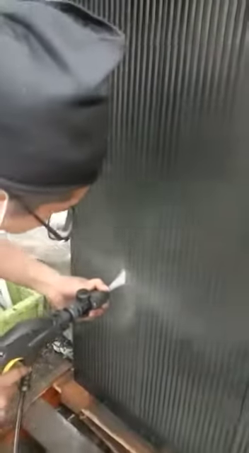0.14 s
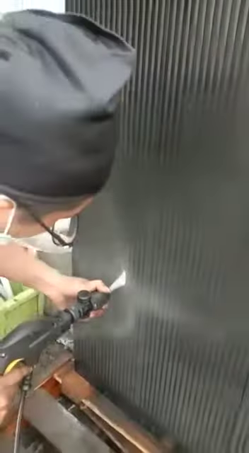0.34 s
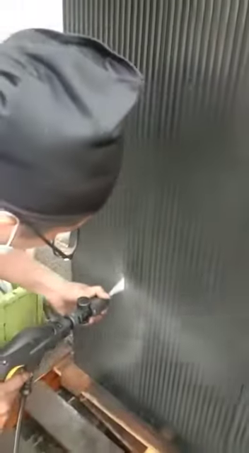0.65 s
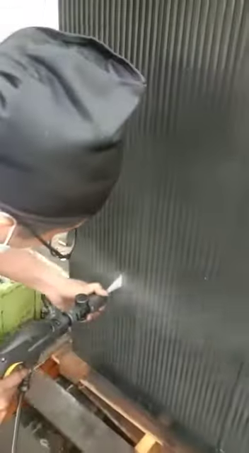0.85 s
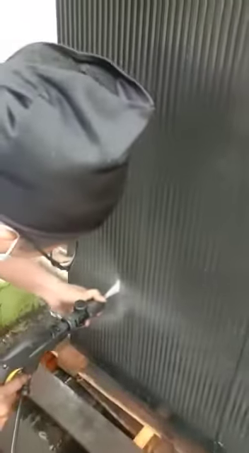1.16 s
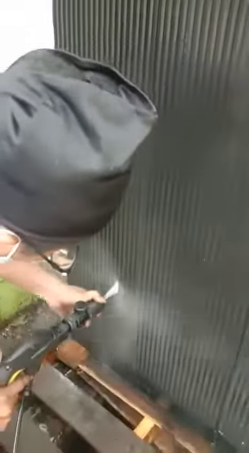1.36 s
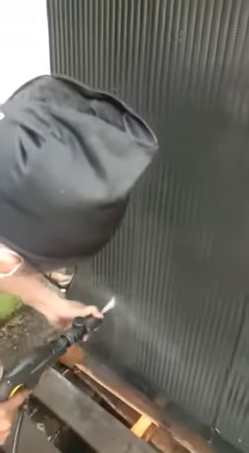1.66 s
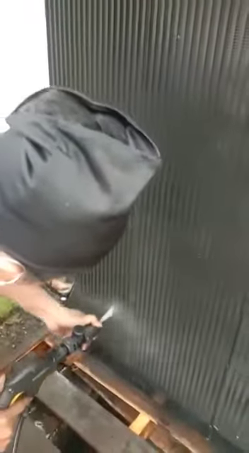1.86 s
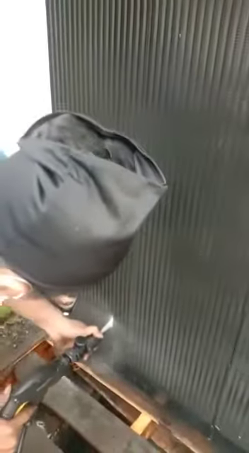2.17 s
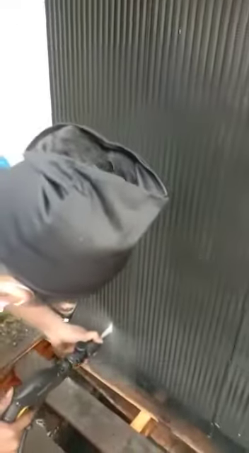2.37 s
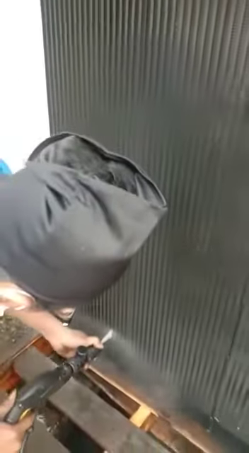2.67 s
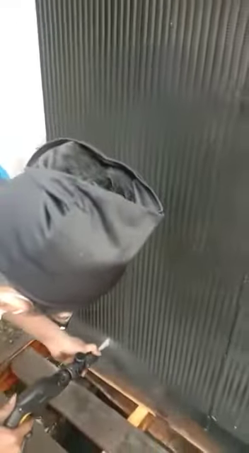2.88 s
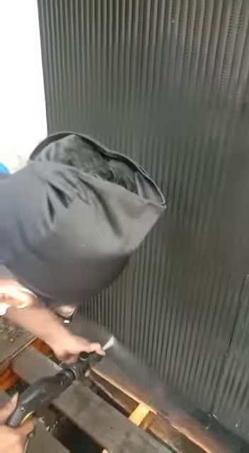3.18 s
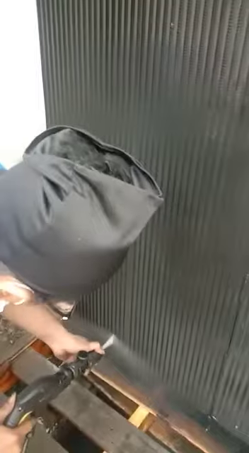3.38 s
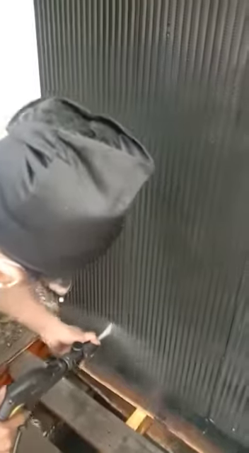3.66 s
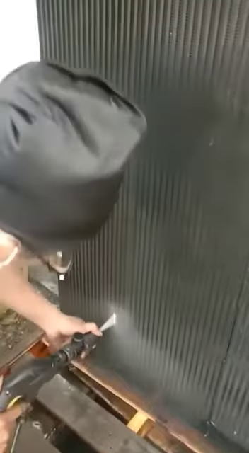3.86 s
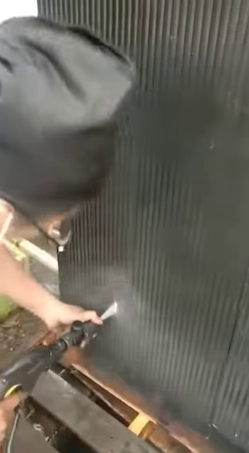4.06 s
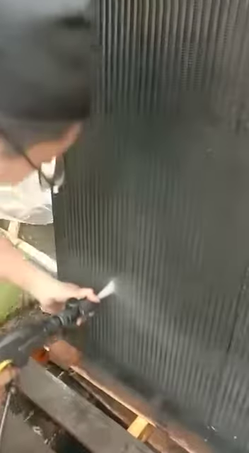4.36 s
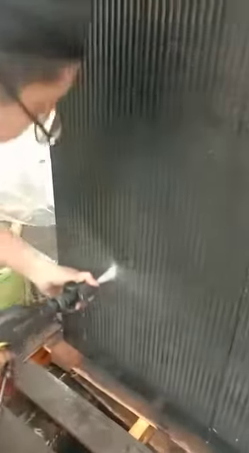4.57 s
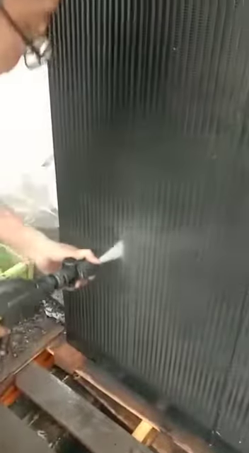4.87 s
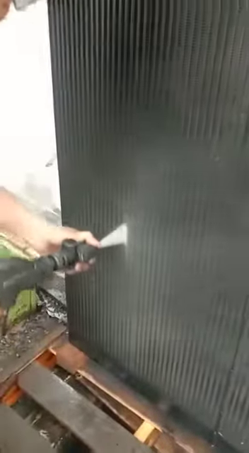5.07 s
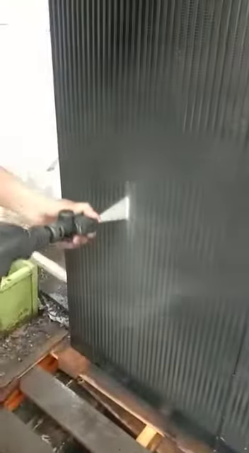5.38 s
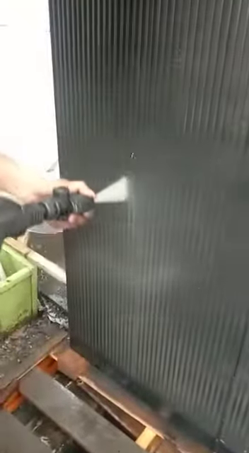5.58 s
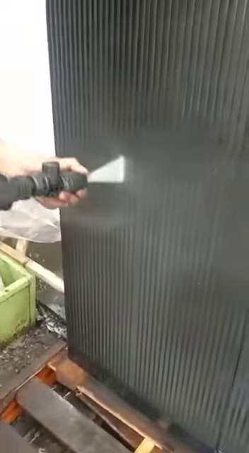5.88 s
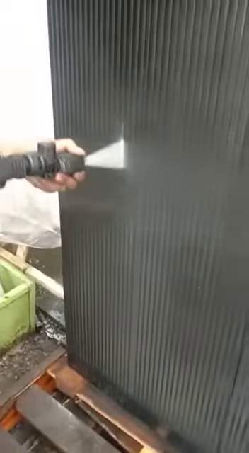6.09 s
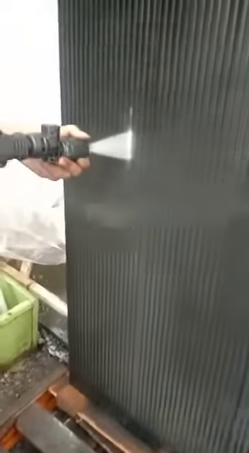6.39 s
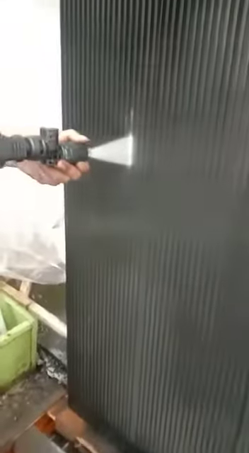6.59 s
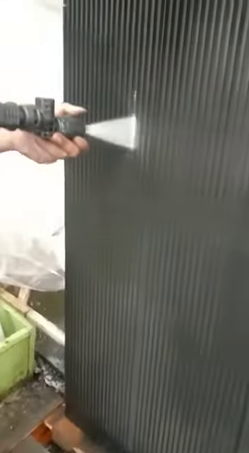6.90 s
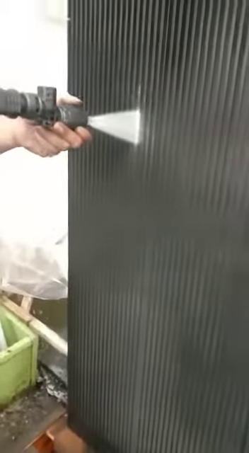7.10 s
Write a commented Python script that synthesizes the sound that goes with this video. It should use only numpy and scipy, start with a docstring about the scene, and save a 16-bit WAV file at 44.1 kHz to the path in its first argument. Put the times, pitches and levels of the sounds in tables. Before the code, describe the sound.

Close by in a workshop, a fan of high-pressure water hisses without a break against the metal fins of a cooler core. Splatter and faint, breathy whistles change colour as the jet moves down, then climbs again. One soft bump comes near the middle and two more a little later. Toward the end the water drums and rings more on the metal. A steady pump hum and low rumble lie beneath.

```python
"""Pressure washing a cooler core

A fan jet sweeps down and up a finned metal core in a workshop. It tears into hissing mist, drums and
splatters on the metal and whistles hoarsely across the fins; a near reflection colours it as the nozzle
moves. The pump and a second motor hum over a low rumble, with three soft bumps."""
import sys
import numpy as np
from scipy import signal
from scipy.fft import rfft, irfft
from scipy.io import wavfile
from scipy.ndimage import uniform_filter1d

SR = 44100
rng = np.random.default_rng(int(sys.argv[2]) if len(sys.argv) > 2 else 0)


def int16_out(signal):
    """Quantize to a 16-bit WAV file."""
    q = np.round(np.clip(np.atleast_2d(signal).T, -1, 1) * 32767)
    wavfile.write(sys.argv[1], SR, q.astype(np.int16))


N = 319284
TIME_S = np.arange(N) / SR
FRAME_S = np.arange(N // 512 + 6) * 512 / SR
BIN_HZ = np.fft.rfftfreq(2048, 1 / SR)
PUMP_SHAFT_HZ, MOTOR_SHAFT_HZ = 45.47, 48.9


def jet(height, slant, echo):
    """The jet tears into spray; each stroke of the three pistons lifts the pressure a little."""
    # a treble hollow slides up as the jet turns square, deepest halfway
    hollow_db = 6.5 * np.sin(np.pi * slant) ** 2 * peak(15000 - 4600 * slant, width_hz=1450)
    patchy_db = 1.5 * patches(frames=13, bins=7)
    spray = (hiss(slant) + mist(height) + sizzle()) * echo * gain_of(patchy_db - hollow_db) ** 2
    flutter_db = 1.2 * patches(frames=4, bins=70) * peak(15800, width_hz=1400)
    strokes = 1 + 0.035 * np.sin(2 * np.pi * 3 * PUMP_SHAFT_HZ * TIME_S)
    return noise(spray * gain_of(flutter_db) ** 2) * strokes * gain_of(0.12 * wander(rate_hz=40))


# Hiss spectrum: freq_hz, relative_db
HISS_SPECTRUM = [(300, -24.5), (900, -14), (2000, -4), (2700, -7), (3100, -0.5), (3800, -1), (5000, -0.5),
                 (5700, 0), (6280, -6), (6680, .5), (7100, 0), (7500, -3), (8050, -15), (16000, -31)]
# Fin channels at full slant: centre_hz, width_hz, gain_db
FIN_CHANNELS = [(2550, 150, -5), (3110, 150, -4.5), (3440, 240, 1), (4350, 330, 2), (4860, 360, -4.5),
                (5900, 590, 3), (6100, 330, 2), (6580, 240, 3.5), (8000, 400, -1.5)]
def hiss(slant):
    """Hiss power; a slanting jet sounds the channels between the fins."""
    channels_db = slant * sum(db * peak(hz, width_hz) for hz, width_hz, db in FIN_CHANNELS)
    return power(colour(HISS_SPECTRUM) * gain_of(channels_db), db=-24)


# Mist spectrum: freq_hz, relative_db
MIST_SPECTRUM = [(5000, -17.5), (7400, -24), (8050, -14), (8650, -2.5), (9500, -0.5), (10200, 1),
                 (11000, 3.5), (12500, 1), (14000, 1.5), (16000, -6)]
def mist(height):
    """Power of the mist thrown off the fins, strongest low on the core."""
    return power(colour(MIST_SPECTRUM), db=-24.5 - 6.5 * height)


# Sizzle spectrum: freq_hz, relative_db
SIZZLE_SPECTRUM = [(8000, -34), (11500, -31), (13200, -7), (13900, -10), (14300, -1), (14620, 4),
                   (15000, 3), (15450, -1), (16000, -23)]
# Sizzle envelope: time_s, relative_db
SIZZLE_ENVELOPE = [(0.0, -26), (0.55, -23), (0.95, -29), (1.3, -24.6), (1.6, -28), (2.25, -25),
                   (2.7, -28.5), (3.9, -25.7), (4.3, -26.7), (5.2, -22), (5.55, -24), (5.95, -30),
                   (6.4, -27.5), (7.24, -29.5)]
def sizzle():
    """Power of the shrill top of the spray."""
    envelope_db, = follow(SIZZLE_ENVELOPE)
    return power(colour(SIZZLE_SPECTRUM), db=envelope_db + 1.4)


def core(height, slant, echo):
    """Water beats on the core: drumming, ringing, splatter and whistles."""
    patchy_db = 1.9 * patches(frames=7, bins=6)
    fins = (splatter(height) + whistles(height)) * echo * gain_of(patchy_db) ** 2
    return noise(drumming(slant) + ring(height) + fins) * gain_of(0.35 * wander(rate_hz=14))


# Core modes: centre_hz, width_hz, square_relative_db, slanted_relative_db
DRUM_MODES = [(647, 78, -5, -1.5), (672, 45, 1, -18), (770, 47, -15, -2.5), (817, 48, 0, -6),
              (878, 60, 1.5, -2), (980, 180, -10, -5)]
def drumming(slant):
    """Power of the core's hollow modes; it drops fastest as the jet first tilts."""
    blended = [(hz, width_hz, square_db + slant * (slanted_db - square_db))
               for hz, width_hz, square_db, slanted_db in DRUM_MODES]
    return power(modes(blended), db=-27 - 14 * slant ** 0.67)


# Ring and its lower neighbours: pitch_ratio, width_hz, relative_db
RING_MODES = [(.868, 45, -10.5), (.925, 75, -9.5), (1, 52, 0)]
# Lively spots on the core: centre_s, half_length_s, lift_db
RING_FLARES = [(1.13, 0.15, 2.5), (2.22, 0.18, 6), (2.58, 0.15, 4.5), (4.1, 0.27, 3.5), (4.5, 0.13, 5.5)]
def ring(height):
    """Power of a narrow ring that grows with height; the pallet damps it at the foot."""
    pitch_hz = 1247 + 36 * height
    shape = modes([(ratio * pitch_hz, width_hz, db) for ratio, width_hz, db in RING_MODES])
    damping_db = 10 * np.exp(-height / 0.041)
    return power(shape, db=-36.5 + 11 * height - damping_db + swells(RING_FLARES))


# Splatter spectrum: freq_hz, relative_db
SPLATTER_SPECTRUM = [(300, -27.5), (700, -10.5), (1030, -21), (1120, -6.5), (1400, -3.5), (1560, -0.5),
                     (1750, -2.5), (2050, 0.5), (2300, 1.5), (2700, -1), (3050, -10), (4500, -29),
                     (8000, -43)]
def splatter(height):
    """Power of water splattering on the fins, strongest high on the core."""
    return power(colour(SPLATTER_SPECTRUM), db=-30 + 5 * height)


# Whistles: start_s, end_s, midway_pitch_hz, level_db
FIN_WHISTLES = [(0.093, .7, 2020, -30.5), (.2, .65, 2650, -31.5), (0.965, 1.6, 2670, -26),
                (1.5, 2.054, 2760, -31.5), (1.72, 2.1, 3460, -32), (2.785, 3.153, 3710, -27.5),
                (2.9, 3.35, 1470, -37.5), (3.15, 3.6, 4270, -30.5), (3.695, 4.332, 2180, -31),
                (3.7, 4.31, 2390, -30), (3.75, 4.263, 2850, -29), (3.78, 4.4, 4020, -30),
                (4.4, 5.0, 1730, -34), (4.68, 5.247, 2370, -27.5), (5.65, 6.25, 1820, -29)]
def whistles(height):
    """Power of hoarse whistles where the jet grazes the fins; pitch sinks as the nozzle climbs."""
    sag_octaves = 0.41  # over the full height
    total = 0
    for start_s, end_s, pitch_hz, level_db in FIN_WHISTLES:
        progress = np.clip((FRAME_S - start_s) / (end_s - start_s), 0, 1)[:, None]
        climb = height - np.interp((start_s + end_s) / 2, FRAME_S, height[:, 0])
        shape = peak(pitch_hz * 2 ** (-sag_octaves * climb), width_hz=0.1 * pitch_hz)
        total = total + power(shape, level_db) * abs(np.sin(np.pi * progress))
    return total


def reflection(height):
    """Power gain: the floor and pallet echo later and weaker as the nozzle rises; walls add ripple."""
    delay_ms = 1.245 + height
    scattering = 1 / (1 + (BIN_HZ / 7000) ** 2)  # rough surfaces return little treble
    strength = 0.15 * (1 - height) * scattering
    comb = abs(1 + strength * np.exp(-2j * np.pi * BIN_HZ * delay_ms / 1000))
    ripple_db = 1.5 * patches(frames=65, bins=3)
    return (comb * gain_of(ripple_db)) ** 2


# Pump hum: shaft_order, rms_db
PUMP_LINES = [(3, -49), (6, -54), (9, -65), (15, -50), (16, -46.5), (17, -49.5), (18, -67), (19, -51.5)]
# Second motor's hum: shaft_order, rms_db
MOTOR_LINES = [(3, -38.5), (10 / 3, -46.5), (4, -51.5), (5, -59.5), (9, -68)]
def hum(shaft_hz, lines, waver_db):
    """Orders of a shaft whose speed drifts slightly under load."""
    turns = np.cumsum(shaft_hz * (1 + 0.00059 * wander(rate_hz=1.5))) / SR
    tones = sum(gain_of(db) * np.sin(2 * np.pi * (order * turns + rng.random())) for order, db in lines)
    return np.sqrt(2) * tones * gain_of(waver_db * wander(rate_hz=6.4))


# Pulses of the three bumps: centre_s, pitch_hz, half_length_s, peak_db
BUMP_PULSES = [(3.218, 80, .007, -23.5), (5.185, 167, 0.0087, -25), (5.204, 367, .0035, -18.5),
               (5.219, 105, 0.0076, -21.5), (5.352, 140, 0.008, -26), (5.370, 179, 0.0028, -14.5),
               (5.384, 140, 0.0097, -23)]
def bumps():
    """Dull pushes of a cycle or two, with no ring."""
    total = 0
    for centre_s, pitch_hz, half_length_s, peak_db in BUMP_PULSES:
        offset_s = TIME_S - centre_s
        envelope = gain_of(peak_db) * np.exp(-(offset_s / half_length_s) ** 2)
        total = total + envelope * np.cos(2 * np.pi * pitch_hz * offset_s)
    return total


# Workshop spectrum: freq_hz, relative_db
RUMBLE_SPECTRUM = [(20, -32), (42, -27), (60, -10), (88, -3.5), (160, -0.5), (205, 0), (270, -2),
                   (310, -6.5), (375, -5), (480, -12.5), (700, -19.5), (2000, -27)]
# Deep bass swells and a dip: centre_s, half_length_s, lift_db
BASS_SWELLS = [(3.25, 0.08, 16), (4.35, 0.47, -8), (4.87, 0.064, 13), (5.32, .12, 14), (5.95, .18, 10),
               (6.82, 0.14, 12)]
def rumble():
    """Low workshop noise, its deepest part swelling now and then."""
    bass_weight = 1 / (1 + (BIN_HZ / 120) ** 4)
    lift_db = swells(BASS_SWELLS) + 2.5 * patches(frames=14, bins=12)
    return noise(power(colour(RUMBLE_SPECTRUM), db=-40) * gain_of(lift_db * bass_weight) ** 2)


def gain_of(db):
    """Decibels to amplitude."""
    return 10 ** (np.asarray(db) / 20)


def unit_rms(x):
    """Scales to rms 1."""
    return x / np.sqrt(np.mean(x ** 2) + 1e-20)


def follow(rows):
    """Columns of a timed table, one value a frame."""
    time_s, *columns = np.transpose(rows)
    return [np.interp(FRAME_S, time_s, column)[:, None] for column in columns]


def swells(rows):
    """Gaussian rises and dips in dB, one value a frame."""
    return sum(db * np.exp(-((FRAME_S[:, None] - centre_s) / half_length_s) ** 2)
               for centre_s, half_length_s, db in rows)


def colour(points):
    """Amplitude per bin from spectrum points."""
    hz, db = np.transpose(points)
    return gain_of(np.interp(np.log(BIN_HZ + 1), np.log(hz), db))


def peak(hz, width_hz):
    """A resonance with steep skirts."""
    return 1 / (1 + ((BIN_HZ - hz) / (0.77 * width_hz)) ** 2)


def modes(rows):
    """Amplitude of resonances added in power."""
    return np.sqrt(sum((gain_of(db) * peak(hz, width_hz)) ** 2 for hz, width_hz, db in rows))


def power(shape, db):
    """Power per bin for this shape and total level."""
    return shape ** 2 / (np.sum(shape ** 2, axis=-1, keepdims=True) + 1e-20) * gain_of(db) ** 2


def patches(frames, bins):
    """Smooth random field over time and frequency, rms 1."""
    white = rng.standard_normal((len(FRAME_S), len(BIN_HZ)))
    return unit_rms(uniform_filter1d(uniform_filter1d(white, frames, axis=0), bins, axis=1))


def wander(rate_hz):
    """Random drift up to about this rate, rms 1."""
    hz = np.fft.rfftfreq(N, 1 / SR)
    return unit_rms(irfft(rfft(rng.standard_normal(N)) / (1 + (hz / rate_hz) ** 4), N))


def noise(bin_power):
    """White noise shaped to a power per frame and bin."""
    white = rng.standard_normal(N + 4096)
    spectra = signal.stft(white, nperseg=2048, noverlap=1536)[2][:, :len(FRAME_S)]
    shaped = spectra * np.sqrt(bin_power * len(BIN_HZ)).T
    return signal.istft(shaped, nperseg=2048, noverlap=1536)[1][:N]


# Nozzle sweep: time_s, height_fraction (0 = foot), slant_fraction (0 = square on)
NOZZLE_SWEEP = [(0, 0.7, 0.9), (.4, 0.43, 0.9), (1.2, 0.44, 0.9), (2.0, 0.15, 0.9), (3.1, 0.03, 1),
                (3.7, 0.12, 1), (4.2, 0.26, .95), (4.75, 0.71, 0.78), (5.3, 0.67, 0.58), (5.7, 0.86, .3),
                (6.1, 0.84, 0.18), (6.65, 1, 0.04), (7.24, 0.87, 0)]
def scene():
    """Spray, core, machines, rumble and bumps, the same in both ears."""
    height, slant = np.clip(follow(NOZZLE_SWEEP), 0, 1)
    echo = reflection(height)
    pump = hum(PUMP_SHAFT_HZ, PUMP_LINES, waver_db=-0.2)
    motor = hum(MOTOR_SHAFT_HZ, MOTOR_LINES, waver_db=1.1)
    mono = jet(height, slant, echo) + core(height, slant, echo) + pump + motor + rumble() + bumps()
    return np.array([mono, mono])


def record(dry):
    """The microphone's low cut, then a steep band limit."""
    low_cut_hz, high_cut_hz = 42, 15600
    highpass = signal.butter(3, low_cut_hz, "highpass", fs=SR, output="sos")
    lowpass = signal.firwin(701, high_cut_hz, window=("kaiser", 9), fs=SR)
    return signal.oaconvolve(signal.sosfilt(highpass, dry), lowpass[None], "same")


dry = scene()
out = record(dry)
int16_out(out)
```